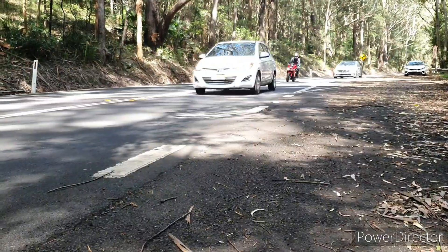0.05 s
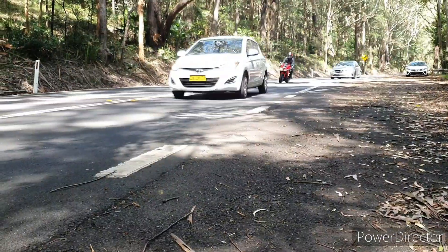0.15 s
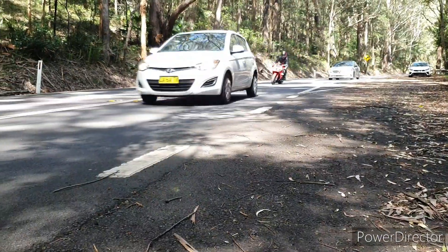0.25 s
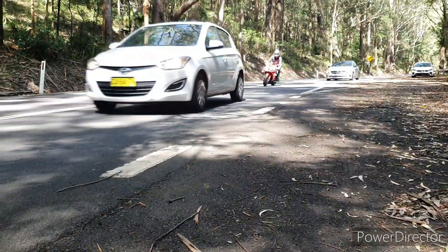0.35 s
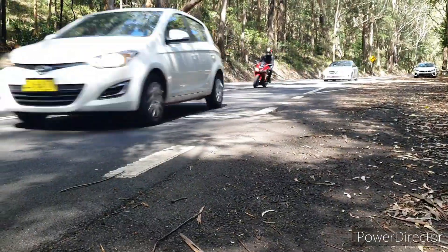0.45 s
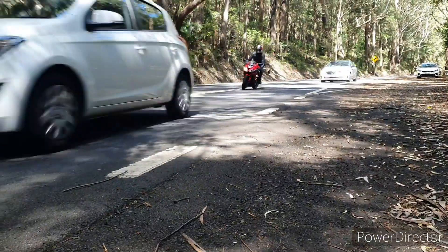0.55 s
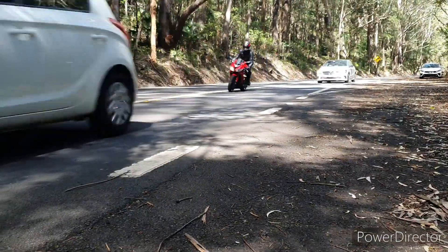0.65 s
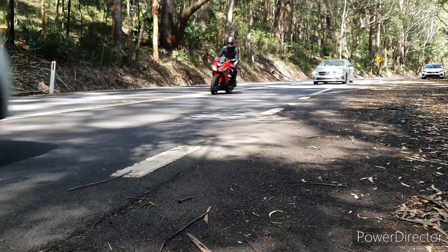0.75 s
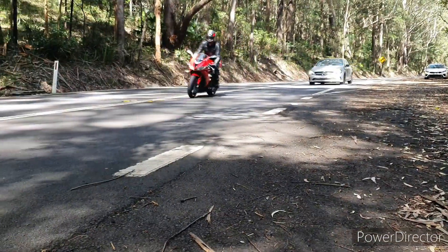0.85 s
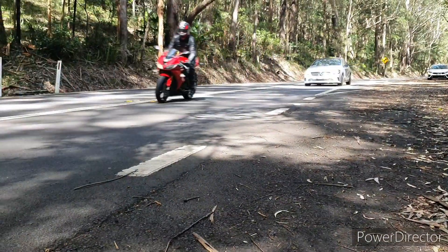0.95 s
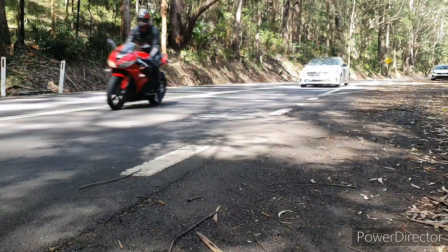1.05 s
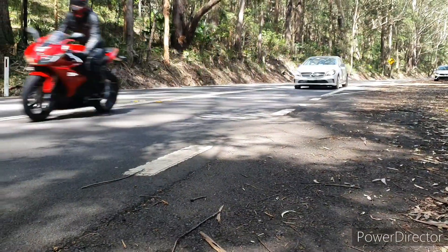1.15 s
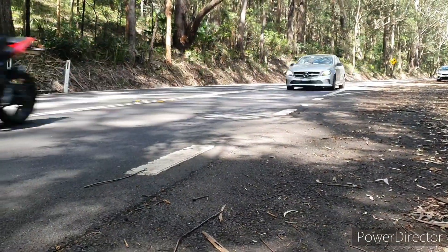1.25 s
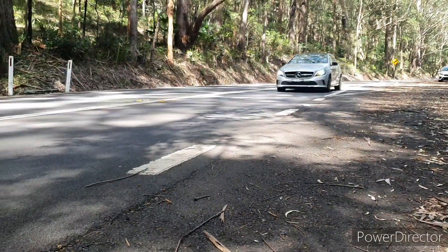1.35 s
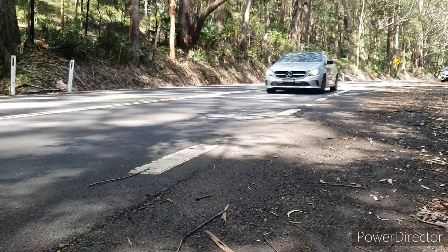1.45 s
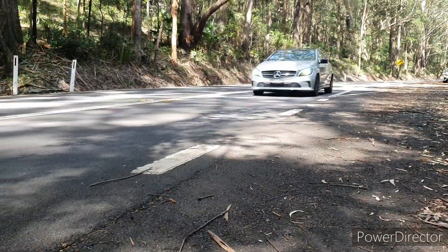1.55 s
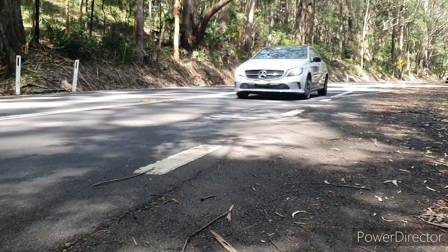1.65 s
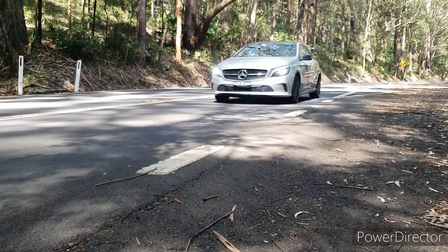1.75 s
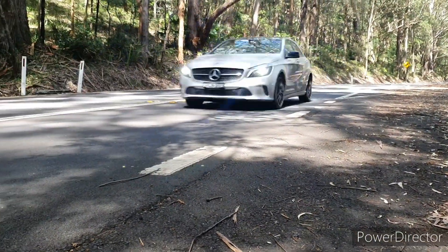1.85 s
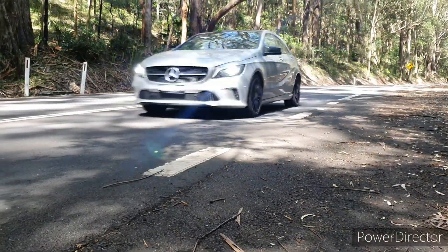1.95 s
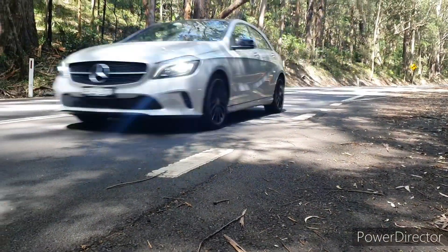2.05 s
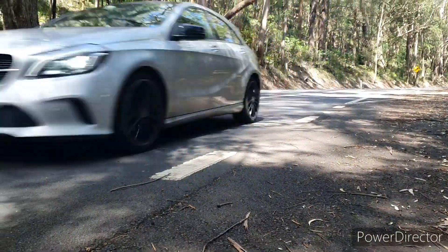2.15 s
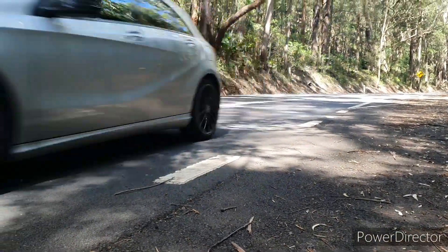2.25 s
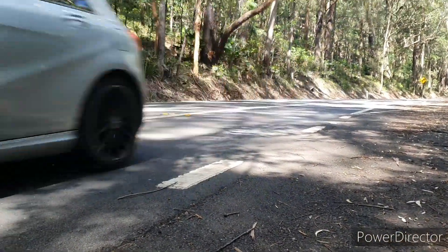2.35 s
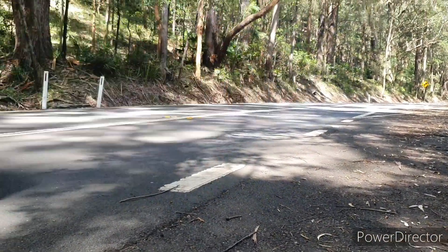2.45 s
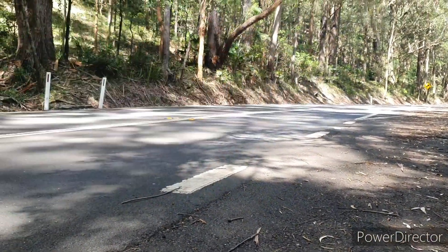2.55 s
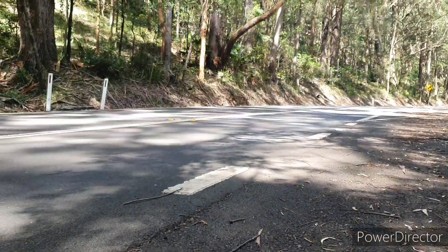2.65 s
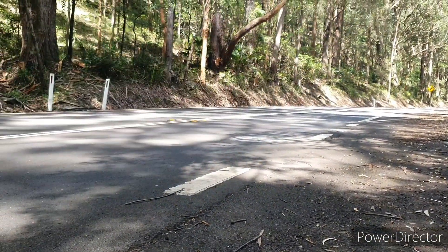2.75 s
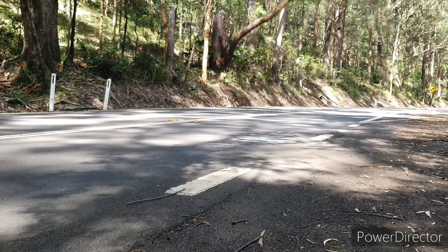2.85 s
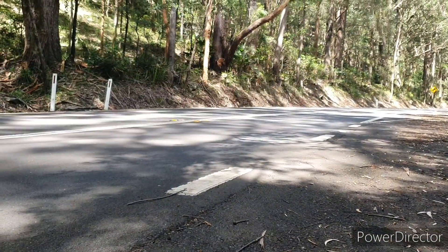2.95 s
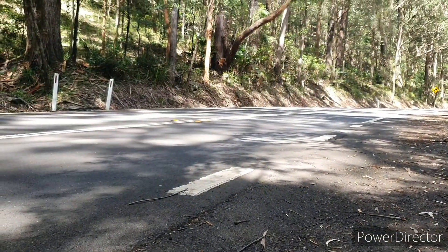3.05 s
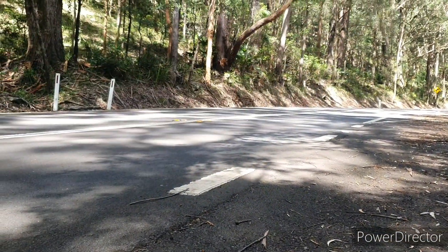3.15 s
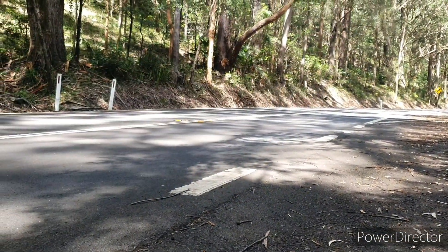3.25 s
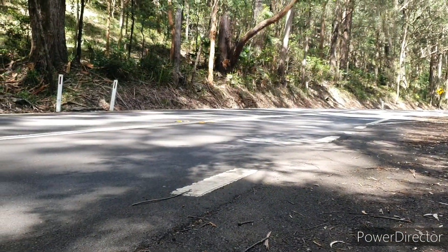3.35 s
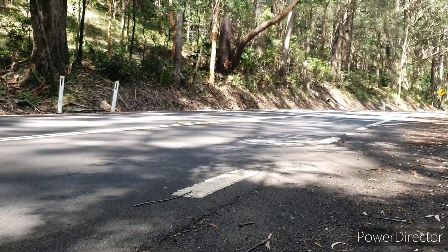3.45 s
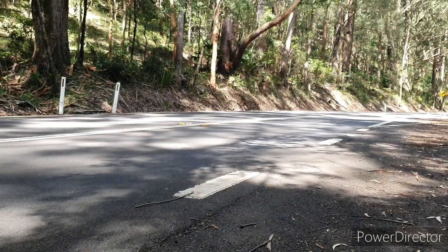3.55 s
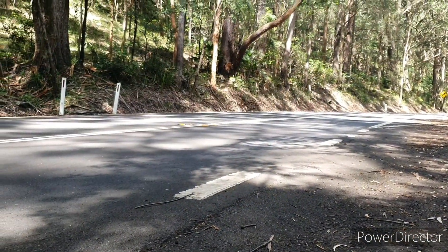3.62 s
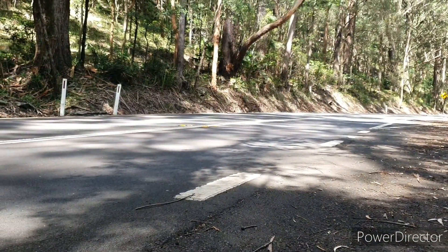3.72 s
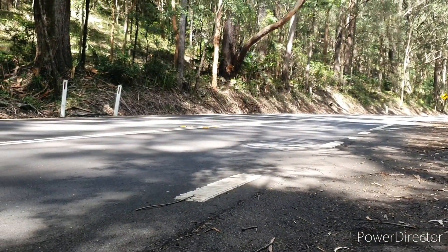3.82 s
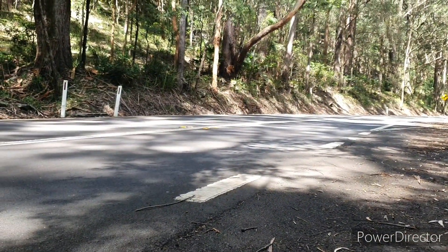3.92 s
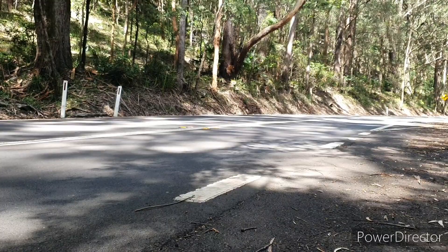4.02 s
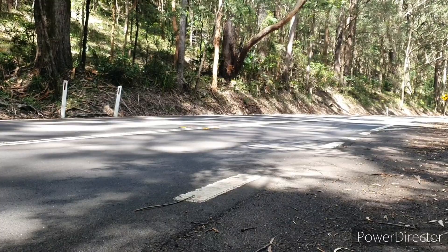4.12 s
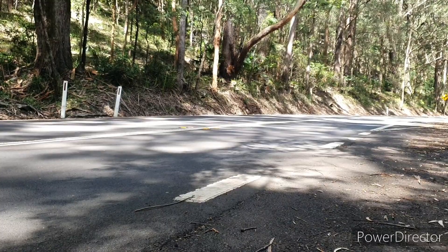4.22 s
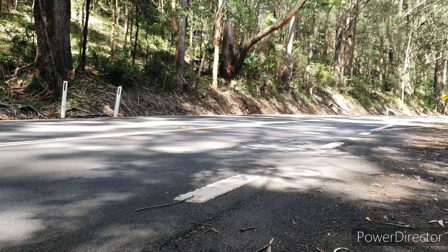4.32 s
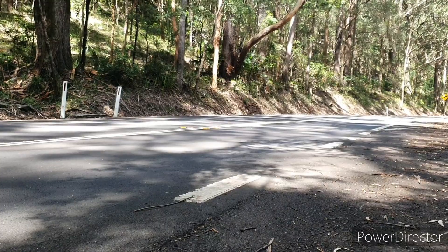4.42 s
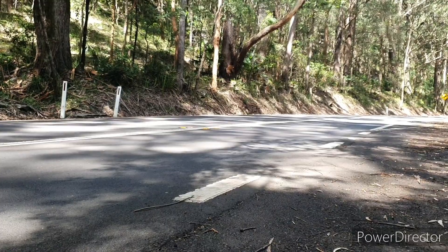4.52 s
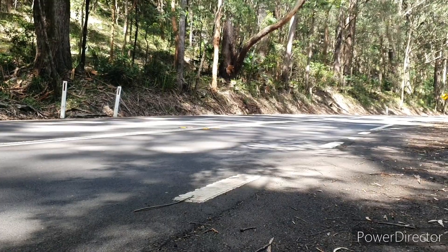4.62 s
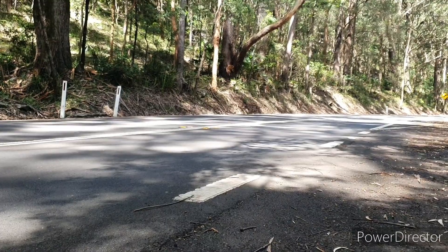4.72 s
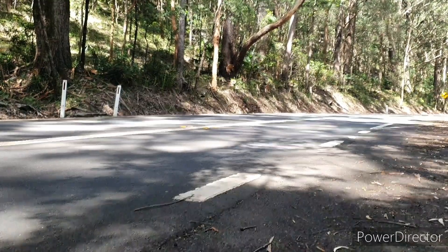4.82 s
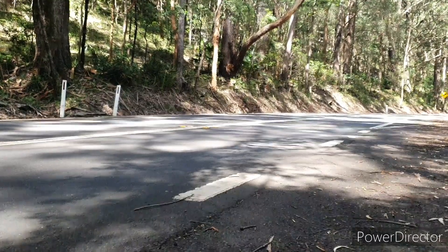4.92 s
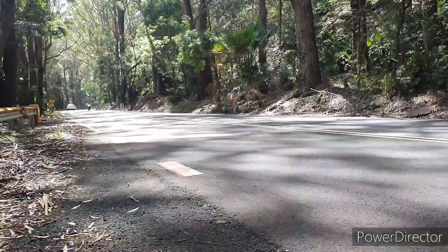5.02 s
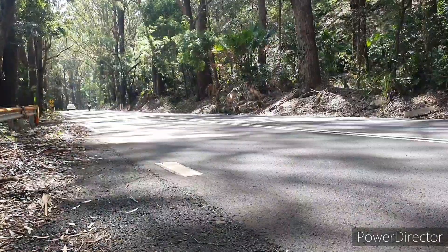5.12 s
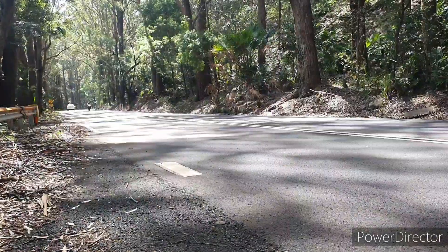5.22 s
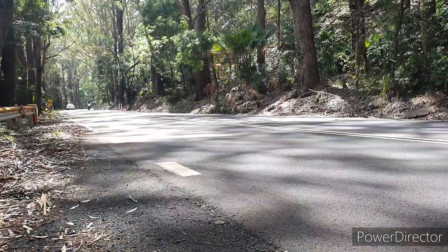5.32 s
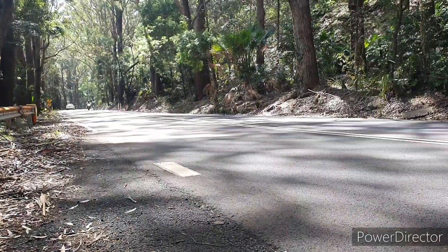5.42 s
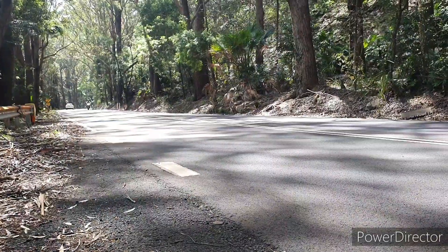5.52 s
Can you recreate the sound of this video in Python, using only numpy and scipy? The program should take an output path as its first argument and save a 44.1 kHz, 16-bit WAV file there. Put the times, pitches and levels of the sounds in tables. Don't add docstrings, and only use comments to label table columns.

```python
import sys
import numpy as np
from scipy import signal
from scipy.fft import rfft, irfft
from scipy.io import wavfile
from scipy.ndimage import uniform_filter1d, minimum_filter1d

SR = 44100
rng = np.random.default_rng(int(sys.argv[2]) if len(sys.argv) > 2 else 0)


def linear_from_db(decibels):
    return 10 ** (np.asarray(decibels, float) / 20)


def dump_mix(stems):
    frames = np.atleast_2d(stems).T
    limited = np.clip(frames, -1, 1)
    pcm = np.round(limited * 32767).astype(np.int16)
    wavfile.write(sys.argv[1], SR, pcm)


N = 246078

# time in seconds, firing rate in Hz, level in dB,
# bite of the higher orders in dB.
APPROACH_STATE = [(0.0, 151, -8.5, -7), (0.2, 148.6, -12.5, -2.5), (0.45, 146.6, -10.5, -6),
                  (0.7, 142.9, -10, -1), (1.03, 138.5, -7.5, -2), (1.382, 134.7, -7.5, 6),
                  (1.59, 128.3, -6.5, -3.5), (1.62, 126.7, -10, 6.5), (1.66, 133, -13.5, 2)]
STUMBLE_STATE = [(1.668, 121.6, -1.5, 0), (1.76, 123, -2, 1.5), (1.868, 125.4, -2.5, -4.5),
                 (1.885, 125.5, -0.5, 1.5)]
PULL_STATE = [(1.89, 120.7, 2, -2.5), (2.05, 123.2, 0.5, -3.5), (2.15, 125.6, 0.5, -1.5),
              (2.38, 131, 1.5, -1.5), (2.8, 142.1, -1.5, 3), (3.1, 150.4, -4, 4), (3.3, 154.1, -4, -4),
              (3.6, 161.8, -3.5, -5), (3.88, 169.6, -3, -1.5), (4.18, 176.6, -1, -2), (4.5, 179.2, 0, -2),
              (4.66, 181.9, 0, -6)]
SHUT_STATE = [(4.66, 178.5, -8, -4), (4.69, 171.7, -2, 0), (4.725, 176.7, -2.5, -0.5),
              (4.967, 176.7, -4, -1), (4.987, 180, -5, -2)]
# frequency in Hz, gain in dB.
APPROACH_PIPE = [(153, 0.5), (255, -8.5), (300, -14.5), (385, -30), (405, -18.5), (450, -23), (540, -51),
                 (600, -24.5)]
STUMBLE_PIPE = [(124, -24), (248, -21), (372, -28), (496, -25.5)]
PULL_RESPONSE = [(125, -30.5), (155, -20.5), (177, -18), (183, -30), (250, -10.5),
                 (310, -18), (358, -14.5), (375, -21), (395, -14), (470, -16.5), (560, -21), (630, -39),
             (720, -33.5)]
SHUT_PIPE = [(177, -15), (354, -18.5), (531, -32.5), (708, -53)]
# frequency in Hz, gain in dB.
SILENCER = [(500, -5), (700, 1), (850, -10.5), (1030, -9), (1130, -5), (1230, 1.5), (1330, -21.5),
            (1800, -10.5), (2300, -19), (3000, -27)]
# release in seconds,
# swing as a share of speed, wind-up in seconds, period in seconds, decay in seconds.
JOLTS = [(2.0, 0.0772, 0.0493, 0.0784, 0.081), (3.079, 0.0584, .015, 0.093, 0.067),
         (3.69, 0.021, 0.014, 0.0915, 0.1)]
# time in seconds, level in dB, ring in Hz.
MISFIRES = [(1.6221, 2.5, 320), (1.633, -5, 120), (1.666, -2, 250), (1.89, -6, 300), (4.658, -12, 200)]
# time in seconds, nearness in dB, engine load in dB.
BIKE = [(0.0, -17.5, -6.5), (0.3, -17, -10), (0.73, -11.5, -5), (1.01, -8.5, -3.5), (1.09, -4.5, -4.5),
        (1.28, -6, -7), (1.45, -0.5, -3), (1.61, -3.5, 0), (1.68, -13, -14), (1.9, -13, 2.5),
        (2.12, -16.5, -4), (2.6, -25, -6), (3.05, -20, -10.5), (3.5, -29, -13.5), (4.13, -25, -9.5),
        (4.45, -22.5, -4), (4.7, -27, -4.5), (4.97, -31.5, -8.5)]
# time in seconds, lag in samples.
PORT_LAG = [(0, 1), (1.2, 2.6), (1.6, 21.8), (2.1, 13.4), (4.9, 11.6), (5.1, 4.1)]
# frequency in Hz, left over right in dB.
PORT_SHADE = [(60, 0.5), (250, .5), (500, 0.5), (700, 7), (1300, 6.5), (4000, 2.5)]
# frequency in Hz, left over right in dB.
ROAD_TILT = [(60, 1), (180, 2.5), (540, 0.5), (1640, 1), (4930, 2), (14800, 6)]
# frequency in Hz, share from one direction.
ROAD_SHARED = [(30, 0.34), (300, 1), (700, 0.81), (1500, 0.33), (4000, 0.47), (12000, 0.13)]
# frequency in Hz, level in dB per Hz.
ROAD_SPECTRUM = [(15, -56.5), (25, -37), (59, -34.5), (107, -15.5), (136, -2.5), (155, -10.5), (214, -3),
                 (329, 2), (454, -2.5), (912, -24), (1440, -32), (4100, -53), (7210, -58.5), (9430, -55.5),
                 (15300, -60.5)]
# closest time in seconds, tyre level in dB, half width in seconds,
# groove resonance in Hz.
WHEEL_PASSES = [(0.1, -24.5, 0.77, 1680), (0.6, -19.5, 0.32, 1070), (0.9, -38.5, 0.09, 890),
                (1.1, -24, 0.23, 1560), (1.48, -28.5, 0.05, 2260), (2.27, -33.5, 0.27, 1770),
                (3.35, -44, 0.13, 1840), (5.7, -38, 0.45, 947)]
# peak
# time in seconds, drone in Hz, level in dB, half width in seconds.
DRONE_SURGES = [(0.05, 77.7, -21.5, 0.24), (0.37, 76, -19.5, 0.12), (0.61, 75.05, -19, 0.11),
                (0.96, 74.1, -10.5, 0.17), (1.15, 70.8, -18.5, .12), (1.63, 81.5, -9.5, 0.035),
                (1.76, 61.7, -9.5, 0.033), (1.89, 75.1, -13.5, 0.032), (2.2, 72.5, -31, .06),
                (2.6, 56, -26.5, 0.11), (4.801, 56.9, -44, 0.33)]
# time in seconds, tooth rate in Hz, level in dB.
GEAR_WHINE = [(.5, 4360, -46), (.75, 4300, -33.5), (1.2, 4160, -36), (1.28, 4090, -26), (1.37, 4050, -26),
              (1.44, 3860, -30), (1.53, 4045, -21), (1.61, 3890, -29), (1.75, 3760, -36), (2.2, 3900, -46),
              (3.1, 4360, -43.5), (4.9, 3885, -60), (5.1, 4020, -58.5)]
# peak time in seconds, level in dB, half width in seconds.
INSECT_SWELLS = [(3.1, -51, .6), (4.5, -50, 0.27), (5.5, -56.5, .4)]
# start in seconds, end in seconds.
DROPOUT_S = (4.986, 5.0259)
# time in ms, height, width in ms.
TWIN_CYCLE = [(0, -1., .6), (1.8, .2, .6), (3.6, .3, .6), (5.5, .75, .6), (7, -.4, .55), (9.6, .5, 1.4),
              (14.2, -.85, 1.6), (20.5, .45, 3.), (28, -.15, 2.5)]
# multiple of the cycle rate, level in dB.
TWIN_ORDERS = [(1, -17), (2, 5), (3, -4), (4, -1.5), (5, -2), (6, -5.5), (7, -12.5), (8, -3), (9, 0),
               (10, -5), (11, -27), (12, -28.5), (13, -9.5), (14, -5.5), (15, -10.5), (16, -22), (17, -45),
               (18, -38), (19, -29), (20, -27.5), (21, -25), (22, -34), (23, -25.5), (24, -34), (25, -24),
               (26, -23.5)]

BODY_DB, TYRE_DB, CHAIN_DB, HISS_DB = -26.5, -34, -25.5, -30
FAR_BODY_DB, FAR_TYRE_DB, FAR_CHAIN_DB, FAR_HISS_DB = -41, -43, -57.5, -68.5
CHAIN_PER_NEAR, CHAIN_PER_LOAD, TYRE_PER_NEAR, TYRE_PER_LOAD = 0.71, 0.11, 0.22, 0.18
FAR_NEARS_DB_PER_S, AIR_DB_PER_S = 1, 12


def evened(x):
    return x / np.sqrt(np.mean(x ** 2) + 1e-20)


def read(points, hz):
    f, value = np.transpose(points)
    return np.interp(np.log(hz + 1), np.log(f + 1), value)


def curves(rows, t):
    s, *columns = np.transpose(rows)
    return [np.interp(t, s, column) for column in columns]


def swells(rows, t, floor_db):
    power = sum(linear_from_db(db) ** 2 / (1 + ((t - s) / half_s) ** 2) ** 2 for s, db, half_s in rows)
    return 10 * np.log10(power + linear_from_db(floor_db) ** 2)


def wander(hz, count=N):
    size = max(int(SR / hz), 1)
    smooth = uniform_filter1d(rng.standard_normal(count), size)
    return evened(uniform_filter1d(smooth, size))


def resonate(x, hz, width_hz):
    turn = np.exp(2j * np.pi * np.cumsum(hz * np.ones(len(x))) / SR)
    pole = np.exp(-np.pi * width_hz / SR)
    return 2 * (turn * signal.lfilter([1 - pole], [1, -pole], x / turn)).real


def fuzzy_band(hz, width_hz):
    return evened(resonate(resonate(rng.standard_normal(N), hz, width_hz), hz, width_hz))


def triple(rows, pipe, upper_db, uneven, firing_s, cylinders, count, rough_db, turn, early, odd):
    begin_s, end_s = rows[0][0], rows[-1][0]
    first = max(int((begin_s - .01) * SR), 0)
    t = np.arange(first, int((end_s + .01) * SR)) / SR
    n = len(t)
    hz, level_db, bite_db = curves(rows, t)
    throb_db, throb_hz, throb_s = 5.5, 10.3, 0.42
    level_db = level_db - throb_db * np.sin(np.pi * throb_hz * t) ** 2 * np.exp(-(t / throb_s) ** 2)
    for s, swing, windup_s, period_s, decay_s in JOLTS:
        after = np.maximum(t - s, 0)
        envelope = np.exp(-after / decay_s + np.minimum(t - s, 0) / windup_s)
        hz = hz * (1 + swing * np.cos(2 * np.pi * after / period_s) * envelope)
    angle = 2 * np.pi * np.cumsum(hz * (1 + 0.005 * wander(64, n))) / SR
    angle -= np.interp(firing_s, t, angle)
    timed = angle + early * uneven * np.sin(angle / cylinders)
    shape = np.interp(t, [begin_s, end_s], turn)
    out = np.zeros(n)
    for k in range(1, count + 1):
        pipe_db = read(pipe, k * hz) if k <= 4 else upper_db + read(SILENCER, k * hz)
        order_db = level_db + bite_db * np.clip((k - 2) * 0.47, 0, 1) + pipe_db
        level = np.sqrt(2) * linear_from_db(order_db + rough_db * wander(25, n))
        out += level * np.cos(k * timed + shape + .2 * wander(20, n))
    cylinder_swing = odd[0] * np.cos(angle / cylinders) + odd[1] * np.sin(2 * angle / cylinders)
    out *= 1 + uneven * (cylinder_swing + .1 * wander(90, n))
    edge_s = np.minimum(t - begin_s, end_s - t)
    return np.pad(out * np.clip(edge_s / 0.0072 + .5, 0, 1), (first, N - first - n))


def bike_exhaust():
    bike = triple(APPROACH_STATE, APPROACH_PIPE, upper_db=-33, uneven=.12, firing_s=1.618, cylinders=3,
                  count=7, rough_db=.8, turn=(1.6, 1.6), early=.25, odd=(.15, .8))
    stumble = triple(STUMBLE_STATE, STUMBLE_PIPE, upper_db=-39, uneven=0.96, firing_s=1.7435, cylinders=2,
                     count=5, rough_db=2., turn=(1.4, 1.4), early=0, odd=(1, .3))
    bike += stumble + linear_from_db(5) * resonate(stumble + 1e-12, 231, 58)
    bike += triple(PULL_STATE, PULL_RESPONSE, upper_db=-37.5, uneven=.079, firing_s=1.8905, cylinders=3,
                   count=16, rough_db=1.2, turn=(1.3, 3.3), early=.3, odd=(1, .3))
    bike += triple(SHUT_STATE, SHUT_PIPE, upper_db=-50.5, uneven=0.22, firing_s=4.977, cylinders=3,
                   count=8, rough_db=.8, turn=(3., 3.), early=.4, odd=(1, .3))
    pipe_cut = signal.butter(2, 57, "highpass", fs=SR, output="sos")
    return signal.sosfiltfilt(pipe_cut, bike + misfires())


def trunks(x):
    t = np.arange(int(.5 * SR)) / SR
    signs = rng.choice([-1., 1.], (2, len(t)))
    hits = rng.random((2, len(t))) < .04
    taps = signs * hits * linear_from_db(-60 * t / 0.39) * (t > .008)
    taps = signal.sosfilt(signal.butter(2, [330, 3000], "bandpass", fs=SR, output="sos"), taps)
    return signal.fftconvolve(x[None], taps / np.linalg.norm(taps[0]), axes=1)[:, :N]


def cars():
    t = np.arange(N) / SR
    hz = curves(DRONE_SURGES, t)[0]
    level_db = swells([(s, db, half_s) for s, _, db, half_s in DRONE_SURGES], t, floor_db=-38.5)
    line = np.sqrt(2) * np.sin(2 * np.pi * np.cumsum(hz) / SR)
    return linear_from_db(level_db - 3.5) * (.5 * fuzzy_band(hz, 35) + 0.62 * line) * (t < DROPOUT_S[0])


def road_levels(t):
    near_db, load_db = curves(BIKE, t)
    far, nears_db = t > 5, FAR_NEARS_DB_PER_S * (t - 5)
    rolling_db = TYRE_DB + TYRE_PER_NEAR * near_db + TYRE_PER_LOAD * load_db
    rolling_db = np.where(far, FAR_TYRE_DB, rolling_db)
    tyre_db = swells([row[:3] for row in WHEEL_PASSES], t, rolling_db)
    chain_db = CHAIN_DB + CHAIN_PER_NEAR * near_db + CHAIN_PER_LOAD * load_db
    chain_db = np.where(far, FAR_CHAIN_DB + nears_db, chain_db)
    hiss_db = np.where(far, FAR_HISS_DB + nears_db / 2, HISS_DB + near_db)
    body_db = np.where(far, FAR_BODY_DB + nears_db, BODY_DB + load_db)
    return tyre_db, chain_db, hiss_db, body_db


def road():
    frames, hz = N // 256 + 5, np.fft.rfftfreq(1024, 1 / SR)
    column_hz = hz[:, None]
    t = np.arange(frames) * 256 / SR
    a, b, c, d, patches = rng.standard_normal((frames, 513, 5)).T
    patches = evened(uniform_filter1d(uniform_filter1d(patches, 14, 0), 10, 1))
    flicker = evened(uniform_filter1d(rng.standard_normal(frames), 4))
    tyre_db, chain_db, hiss_db, body_db = road_levels(t)
    centres = np.log([400, 1300, 4000, 9500])
    shape = linear_from_db(read(ROAD_SPECTRUM, hz))
    level_db = 0
    for row, band_db in zip(np.eye(4), (body_db, tyre_db, chain_db, hiss_db)):
        share = np.interp(np.log(hz + 1), centres, row)
        level_db = level_db + share[:, None] * (band_db - 20 * np.log10(np.linalg.norm(share * shape)))
    groove_hz = curves(WHEEL_PASSES, t)[2]
    level_db += 2 * np.exp(-.5 * (np.log((column_hz + 1) / groove_hz) / 0.056) ** 2)
    from_ms, to_ms = 0.023, 0.76
    delay_ms = from_ms + (to_ms - from_ms) * (.5 + .5 * np.tanh((t - 2.2) / 0.22))
    level_db += 0.5 * np.cos(2 * np.pi * column_hz * delay_ms / 1000)
    air_db = 0.33 * (-37.5 - hiss_db) + AIR_DB_PER_S * np.clip(t - 2, 0, 3)
    level_db -= air_db * np.clip(column_hz / 9500 - 1, 0, 1)
    same = np.clip(read(ROAD_SHARED, hz), 0, 1)[:, None]
    left = a + 1j * b
    late = np.exp(-2j * np.pi * column_hz * curves(PORT_LAG, t)[0] / SR)
    right = same * late * left + np.sqrt(1 - same ** 2) * (c + 1j * d)
    z = np.array([left, right])
    z *= shape[:, None] * linear_from_db(level_db + 1.36 * patches + 0.25 * flicker + 5.0)
    z *= linear_from_db(np.array([.5, -.5])[:, None, None] * read(ROAD_TILT, hz)[:, None])
    noise = signal.istft(z, nperseg=1024, noverlap=768)[1][:, :N]
    return noise * (1 + 0.03 * wander(220))


def whine():
    t = np.arange(N) / SR
    hz, db = curves(GEAR_WHINE, t)
    blur = 1 - 0.7 * np.exp(-((t - 1.23) / .5) ** 2)
    ring = 0
    for share, part in ((0.65, 1), (0.26, 0.47)):
        core = fuzzy_band(hz * part, 115)
        halo = fuzzy_band(hz * part, 600 * part)
        ring = ring + share * (np.sqrt(1 - blur) * core + np.sqrt(blur) * halo)
    return linear_from_db(db + 2. * wander(11)) * ring


def misfires():
    t, out = np.arange(N) / SR, np.zeros(N)
    for s, db, hz in MISFIRES:
        turns = np.clip(t - s, 0, .05) * hz
        out -= linear_from_db(db) * np.sin(2 * np.pi * turns) * np.exp(-1.3 * turns)
    return out


def insects():
    band = [evened(resonate(resonate(rng.standard_normal(N), 5720, 900), 5100, 900)) for port in range(2)]
    return linear_from_db(swells(INSECT_SWELLS, np.arange(N) / SR, floor_db=-72)) * np.array(band)


def twin():
    cycle_hz, level_db, nears_db_per_s = 32.14, -21, 2.5
    t = np.arange(5 * SR, N) / SR
    n = len(t)
    angle = 2 * np.pi * cycle_hz * (t - 5.011)
    at_ms, height, width_ms = np.transpose(TWIN_CYCLE)
    out = np.zeros(n)
    for k, order_db in TWIN_ORDERS:
        rad_per_ms = 2 * np.pi * k * cycle_hz / 1000
        pulses = height * np.exp(-.5 * (rad_per_ms * width_ms) ** 2 - 1j * rad_per_ms * at_ms)
        phase = np.angle(np.sum(pulses))
        level = linear_from_db(order_db + .8 * wander(15, n))
        out += level * np.cos(k * angle + phase + .08 * wander(15, n))
    fade_in = np.clip((t - 5) / .015, 0, 1)
    out = linear_from_db(level_db + nears_db_per_s * (t - 5)) * fade_in * evened(out)
    return np.pad(out, (N - n, 0))


def ports(x):
    n = np.arange(N)
    late = np.interp(n - curves(PORT_LAG, n / SR)[0], n, x)
    tilt = linear_from_db(read(PORT_SHADE, np.fft.rfftfreq(N, 1 / SR)) / 2)
    return np.array([irfft(rfft(x) * tilt, N), irfft(rfft(late) / tilt, N)])


def scene():
    bike = bike_exhaust()
    direct = ports(bike + twin() + cars() + whine())
    return direct + linear_from_db(-15.5) * trunks(bike) + road() + insects()


def top_cut(x):
    return signal.sosfilt(signal.butter(12, 15430, fs=SR, output="sos"), x)


def record(dry):
    t = np.arange(N) / SR
    heard = signal.sosfiltfilt(signal.butter(2, 28, "highpass", fs=SR, output="sos"), dry)
    lowpass = signal.firwin(511, 15400, window=("kaiser", 9), fs=SR)
    heard = signal.oaconvolve(heard, lowpass[None], "same")
    peak = -minimum_filter1d(-abs(heard).max(0), 900)
    heard = heard / uniform_filter1d(np.maximum(peak / .97, 1), 600)
    heard = heard - linear_from_db(-27) * np.exp(-abs(t - DROPOUT_S[1]) / .002) * (t > 5)
    sounding = (t < DROPOUT_S[0]) | (t > DROPOUT_S[1])
    return top_cut(np.clip(heard, -1, 1) * sounding)


dry = scene()
out = record(dry)
dump_mix(out)
```